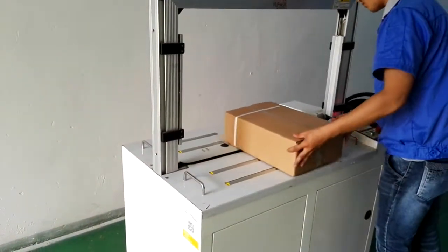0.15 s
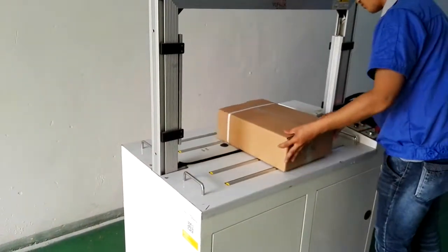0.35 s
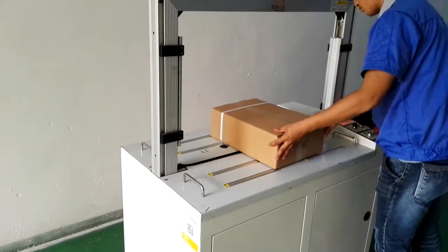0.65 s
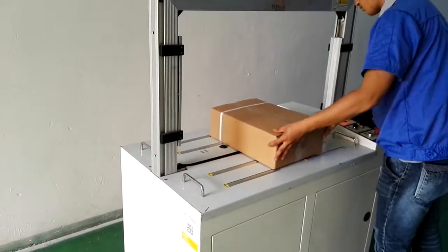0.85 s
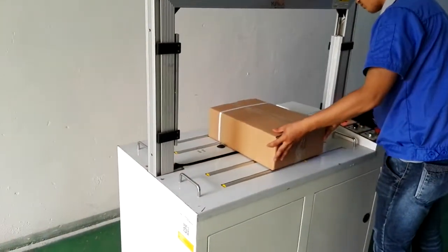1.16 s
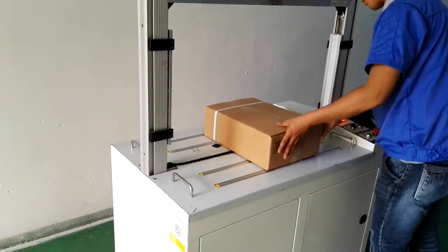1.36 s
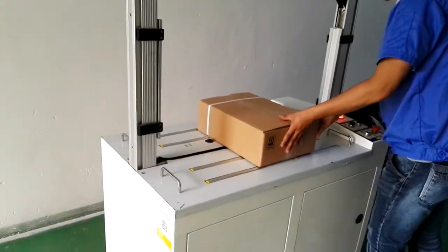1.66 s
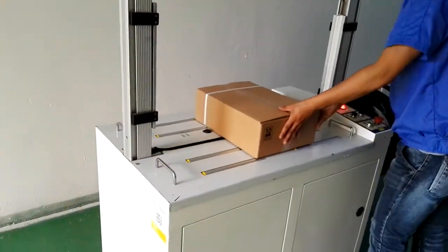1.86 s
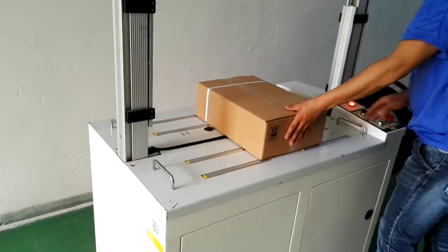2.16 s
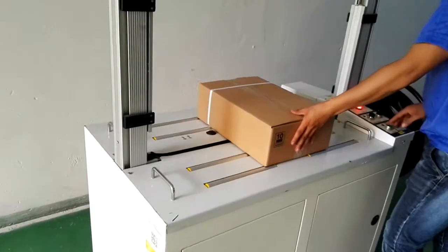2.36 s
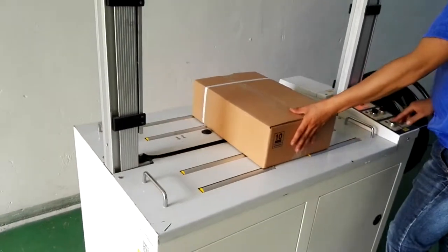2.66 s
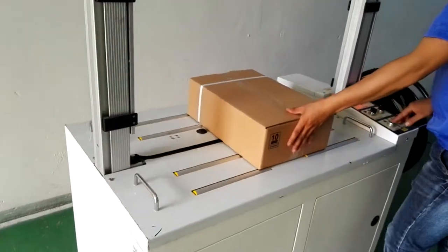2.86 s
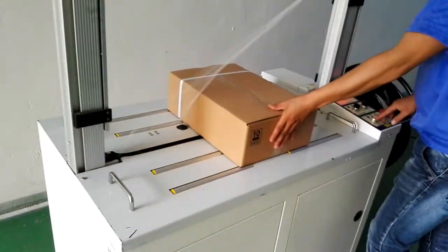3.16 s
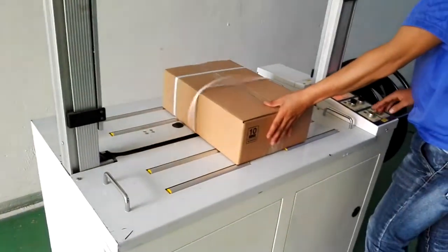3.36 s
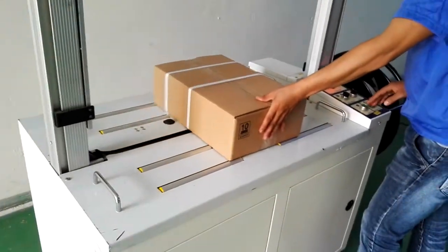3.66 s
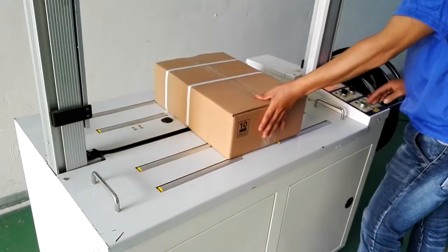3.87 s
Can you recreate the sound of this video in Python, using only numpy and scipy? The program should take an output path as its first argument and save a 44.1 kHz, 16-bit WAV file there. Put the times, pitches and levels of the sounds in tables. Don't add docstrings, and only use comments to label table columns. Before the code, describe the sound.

A strapping machine fires after almost three quiet seconds of hum, faint cardboard scrapes and brushes: clacks, racing strap rattle, brief gear whine, then a distorted slap at the close microphone and a reverberant factory tail.

```python
import sys
import numpy as np
from scipy import signal
from scipy.fft import rfft, irfft
from scipy.io import wavfile
from scipy.ndimage import uniform_filter1d

SR = 44100
rng = np.random.default_rng(int(sys.argv[2]) if len(sys.argv) > 2 else 0)


def transcribe(u):
    v = np.clip(np.atleast_2d(u).T, -1, 1)
    q = np.round(v * 32767).astype(np.int16)
    wavfile.write(sys.argv[1], SR, q)


def to_linear_factor(level_db):
    exponent = np.asarray(level_db, float) / 20
    return 10 ** exponent


N = 176400

# pitch_hz, width_hz, level_db
SLAP_RINGS = [(490, 150, -10), (1000, 200, -11), (4620, 220, -3.5), (7500, 500, -5), (11400, 600, -8),
              (13300, 900, -5)]
# freq_hz, left_minus_right_db
SLAP_PAN = [(60, 5.5), (200, 6), (700, 6), (4000, 3), (8000, 8), (14000, 2)]
# freq_hz, gain_db
SLAP_AWAY = [(600, 0), (3500, -1), (4600, -8), (6000, 0), (12000, 2)]
# time_s, level_db
STRAP_SPEED = [(3.055, -64), (3.09, -30), (3.15, -26.5), (3.21, -25), (3.285, -31), (3.31, -29.5),
               (3.43, -28), (3.47, -32.5), (3.54, -30.5)]
# freq_hz, density_db_per_hz
STRAP_TONE = [(59, -25), (100, -6.5), (358, -16.5), (699, -24.5), (880, -13), (1420, -4), (2560, -9.5),
              (10200, -12), (14800, -19)]
# pitch_hz, width_hz, level_db
CHUTE = (2857, 380, -13.5)
# time_s, level_db
DRIVE_LOAD = [(2.95, -46.5), (3.05, -39), (3.15, -35.5), (3.5, -39), (3.62, -35.5), (3.8, -43.5),
              (3.9, -39), (3.96, -45.5), (4.0, -37)]
# freq_hz, density_db_per_hz
DRIVE_TONE = [(24, -46), (40, -39), (122, 5.5), (362, -6), (706, 1), (839, -6), (1410, -6), (13700, -22),
              (14800, -22)]
# pitch_hz, level_db, t60_s
CLUTCH_MODES = [(221.6, -5, 0.29), (444, -6.5, 0.29), (665, -6.5, 0.48), (709, -1.5, 0.48),
                (793, -4.5, 0.37), (2000, -3, 0.22)]
# start_s, level_db, ring_hz, t60_s, thud_db
BLOWS = [(2.938, -23.5, 5600, 0.21, -12), (3.0674, -22, 7000, 0.13, -1), (3.0723, -21, 7100, .1, -4),
         (3.0942, -15.5, 6000, 0.14, 6), (3.1456, -8.5, 4000, 0.11, 9.5), (3.1505, -9.5, 7900, .14, 4),
         (3.1875, -14.5, 7500, 0.083, 1), (3.2196, -9, 10200, 0.11, -12), (3.293, -4.5, 9800, 0.16, -9),
         (3.4312, -13.5, 7250, 0.035, 3), (3.4919, -9, 9900, 0.064, -16), (3.4992, -20, 10500, 0.033, -19),
         (3.5154, -7, 9050, 0.11, -1.5), (3.5242, -14.5, 11100, 0.15, -2), (3.8298, -27, 4600, 0.15, 3),
         (3.896, -28, 3700, 0.16, -8), (3.994, -24.5, 6700, 0.08, 0.5)]
# start_s, pitch_hz, level_db, t60_s
PINGS = [(2.938, 5190, -40, 0.16), (2.938, 7230, -34.5, 0.095), (2.938, 8200, -37.5, .1),
         (3.151, 7900, -23, .04), (3.155, 4150, -24, .06), (3.22, 7400, -25, .04), (3.101, 1300, -26, .1),
         (3.2935, 10000, -22.5, 0.24), (3.2935, 4550, -19.5, 0.079), (3.2935, 13460, -20.5, .06),
         (3.2935, 12130, -27, 0.21), (3.4315, 7000, -22.5, 0.046), (3.4915, 9940, -24, 0.056),
         (3.516, 499, -32, .12)]
# freq_hz, gain_db
CABINET = [(30, -25), (90, -16), (125, -4), (200, 0.5)]
# time_s, mesh_db, shaft_db
GEAR_LOAD = [(3.15, -50, -46), (3.22, -40, -41), (3.3, -36, -36), (3.335, -27.5, -37), (3.36, -31, -40),
             (3.4, -29, -44), (3.495, -30.5, -44), (3.53, -37, -47), (3.65, -46, -54)]
# pitch_hz, width_hz, level_db
MESH_LINES = [(1392.5, 3, 0), (1468, 8, -13), (2780, 60, -18)]
# pitch_hz, width_hz, level_db
SHAFT_LINES = [(139, 10, -9), (276, 10, -7), (416, 10, -9), (541, 10, -7), (689, 12, 0), (712, 14, -6)]
# time_s, level_db
SLIDE = [
    (0.0, -54.5),
    (0.244, -63.5),
    (0.308, -61),
    (0.782, -74),
    (0.81, -67),
    (1.0, -90),
]
# freq_hz, density_db_per_hz
SLIDE_TONE = [(180, -11), (300, -16), (1400, -12), (2500, -13), (5000, -17), (8000, -24), (14800, -36)]
# start_s, length_s, level_db, upper_band_hz
BRUSHES = [
    (0.122, 0.8, -58.5, 10600),
    (0.621, 0.086, -61.5, 9900),
    (1.05, 0.07, -64, 11000),
    (1.429, 0.11, -66.5, 10100),
    (1.841, 0.31, -67, 9050),
    (2.264, 0.22, -71, 9000),
    (2.781, 0.17, -55.5, 6900),
]
# start_s, level_db, ring_hz, t60_s
TICKS = [(0.164, -46, 3900, 0.0083), (.2984, -50, 4000, 0.0087), (0.8048, -52, 5600, 0.01),
         (1.0514, -48, 8000, 0.009), (1.4304, -64, 4640, .008), (1.813, -52, 6360, 0.0092),
         (1.847, -47, 10500, 0.012), (1.992, -53, 4300, .008), (2.0656, -50.5, 3700, 0.0083),
         (2.1218, -52, 3460, 0.0088), (2.249, -47, 3900, 0.009), (2.267, -55, 4280, 0.0076),
         (2.2885, -47.5, 9900, 0.018), (2.2935, -54, 4200, .01)]
# pitch_hz, start_db, fade_db_per_s
COAST = [(143.2, -63, 9), (125.6, -76, .1), (283, -66, 7), (274, -76, 5), (630, -77, 12), (1402, -70, 18)]
# start_s, length_s, pitch_hz, level_db
GEAR_NOTES = [
    (0.0, 0.065, 1420, -55.5),
    (0.118, .08, 1430, -66),
    (.28, .09, 642, -64),
    (0.345, 0.039, 1400, -70),
]
# freq_hz, density_db_per_hz
HALL_TONE = [(25, -3.5), (60, -9), (100, -11), (450, -16), (1000, -17.5), (2300, -24.5), (3000, -30),
             (14800, -41)]
# freq_hz, likeness_0_to_1
HALL_SAME = [(60, .98), (250, 1), (600, 0.77), (1500, 0.099), (5000, 0.054), (14000, 0.23)]
# freq_hz, t60_s
ROOM_T60 = [(100, 2.6), (500, 1.54), (1500, 1.2), (4000, 1), (12000, 0.55)]
# freq_hz, likeness_0_to_1
NEAR_SAME = [(60, 0.99), (300, 0.96), (700, 0.85), (1500, 0.37), (5000, 0.073), (14000, 0.27)]
# freq_hz, gain_db
MIC_CASE = [(3000, -1), (3350, -5.5), (3750, 1)]
# freq_hz, left_minus_right_db
PORT_BALANCE = [(60, 0.5), (600, -0.5), (1260, 3), (2300, -1.5), (4250, -0.5), (7800, -5), (14400, -8.5)]

SLAP_S, SLAP_RISE_S, SLAP_HOLD_S, SLAP_DB = 3.5086, 0.0032, 0.0009, -4
PUSH_S, PUSH_DB = 0.003, -23.5
CLUTCH_S, CLUTCH_DB = 2.94, -38
HUM_HZ, HUM_DB, HUM_WAVER_DB = 134.4, -62, 1.8
HALL_DB, HALL_LEAD_S = -61, 0.000327
ROOM_DB, EARLY_DB = -7, -17.5
WHINE_WET_DB, SLAP_WET_DB = -16, -9.5
NEAR_LEAD_SAMPLES, SLAP_LEAD_SAMPLES = 7, 2


def evened(x):
    return x / np.sqrt(np.mean(x ** 2) + 1e-20)


def read(points, hz):
    f, value = np.transpose(points)
    return np.interp(np.log(hz + 1), np.log(f + 1), value)


def level(curve, off_db=-120):
    s, db = np.transpose(curve)
    return to_linear_factor(np.interp(np.arange(N) / SR, s, db, off_db, off_db))


def add(mix, start_s, sound):
    part = mix[round(start_s * SR):][:len(sound)]
    part += sound[:len(part)]


def colour(x, tone):
    return irfft(rfft(x) * to_linear_factor(read(tone, np.fft.rfftfreq(N, 1 / SR))), N)


def resonate(x, hz, width_hz):
    q = max(hz / width_hz, 0.3)
    return signal.lfilter(*signal.iirpeak(np.clip(hz, 20, 20000), q, SR), x)


def drift(span_s):
    size = int(span_s * SR)
    return evened(uniform_filter1d(uniform_filter1d(rng.standard_normal(N), size), size))


def rattle(per_s, spread_db, smooth):
    knocks = to_linear_factor(spread_db * np.minimum(rng.exponential(1, N), 5)) * (rng.random(N) < per_s / SR)
    decaying = evened(signal.lfilter([1], [1, -0.97], knocks))
    return rng.standard_normal(N) * (smooth + decaying)


def knock(hz, t60_s, thud_db, ring_db, rise_s):
    t = np.arange(0, 0.25, 1 / SR)
    a, b = rng.standard_normal((2, len(t)))
    body = evened(resonate(a, 3000 + 0.58 * hz, 10700))
    body += to_linear_factor(ring_db) * evened(resonate(a, hz, 0.054 * hz + 150))
    body += to_linear_factor(thud_db) * evened(resonate(b, 1440, 2160))
    return np.minimum(t / rise_s, 1) * to_linear_factor(-60 * t / max(t60_s, 0.004)) * body


def slap():
    out, t = np.zeros(N), np.arange(2000) / SR
    rise = np.minimum(t / SLAP_RISE_S, 1) ** 2
    fall = to_linear_factor(-9000 * np.maximum(t - SLAP_RISE_S - SLAP_HOLD_S, 0))
    noise = rng.standard_normal(len(t))
    crack = 0.47 * noise
    for hz, width_hz, db in SLAP_RINGS:
        sine = np.sin(2 * np.pi * (hz * t + rng.random()))
        crack += to_linear_factor(db) * evened(evened(resonate(noise, hz, width_hz)) + 1.9 * sine)
    crack = crack / np.sqrt(uniform_filter1d(crack ** 2, size=60) + 0.22)
    push = np.sin(np.pi * np.clip(t / PUSH_S - 0.5, 0, 1.5)) * np.exp(-t / 0.011)
    add(out, SLAP_S, to_linear_factor(SLAP_DB) * rise * fall * crack + to_linear_factor(PUSH_DB) * push)
    return out


def strap():
    rip = evened(colour(rattle(1200, 2.8, 2.0), STRAP_TONE))
    hz, width_hz, db = CHUTE
    return level(STRAP_SPEED) * (rip + to_linear_factor(db) * evened(resonate(rip, hz, width_hz)))


def cam_drive():
    return level(DRIVE_LOAD) * to_linear_factor(-1.5) * evened(colour(rattle(400, 2.3, 2.6), DRIVE_TONE))


def steel_pings():
    out, t = np.zeros(N), np.arange(SR // 2) / SR
    for s, hz, db, t60_s in PINGS:
        pair = sum(np.sin(2 * np.pi * (hz * k * t + rng.random())) for k in (0.985, 1.017))
        add(out, s, to_linear_factor(db - 5.5 - 60 * t / t60_s) * np.minimum(t / 0.0015, 1) * pair)
    return out


def clutch():
    out, t = np.zeros(N), np.arange(SR // 2) / SR
    modes = sum(to_linear_factor(db - 60 * t / t60_s) * np.sin(2 * np.pi * hz * t) for hz, db, t60_s in CLUTCH_MODES)
    add(out, CLUTCH_S, to_linear_factor(CLUTCH_DB) * np.minimum(t / 0.035, 1) * modes)
    return out


def blows():
    out = np.zeros(N)
    for s, db, hz, t60_s, thud_db in BLOWS:
        add(out, s - 0.001, to_linear_factor(db - 14) * knock(hz, t60_s, thud_db, -9.5, 0.0016))
    return out


def machine():
    return strap() + cam_drive() + steel_pings() + clutch() + blows()


def whine():
    load, out = np.array(GEAR_LOAD), np.zeros(N)
    for column, lines in ((1, MESH_LINES), (2, SHAFT_LINES)):
        for hz, width_hz, db in lines:
            gain = level(load[:, [0, column]]) * to_linear_factor(db + 1.5 * drift(0.015))
            cycles = np.cumsum(hz + 0.4 * width_hz * drift(0.02)) / SR
            out += gain * np.sin(2 * np.pi * cycles)
    return out


def box_slide():
    return level(SLIDE) * evened(colour(rattle(220, 2.9, 4.2), SLIDE_TONE))


def brushes():
    out = np.zeros(N)
    for s, length_s, db, hz in BRUSHES:
        u = np.linspace(0, 1, int(length_s * SR))
        a = rng.standard_normal(SR)[:len(u)]
        mid_db = 2.5 - 8 * (s < 1.2)
        bands = to_linear_factor(mid_db) * resonate(a, 4450, 2600) + to_linear_factor(-1.5) * resonate(a, 2370, 800)
        bands += resonate(resonate(a, hz, 1.3 * hz), hz, 1.5 * hz)
        add(out, s, to_linear_factor(db) * np.minimum(u / 0.081, 1) * (1 - u) * bands)
    return out


def card_ticks():
    out = np.zeros(N)
    for s, db, hz, t60_s in TICKS:
        add(out, s - 0.001, to_linear_factor(db - 3.5) * knock(hz, t60_s, -21, 1.5, 0.0004))
    return out


def hands():
    return box_slide() + brushes() + card_ticks()


def hum():
    t = np.arange(N) / SR
    waver = to_linear_factor(HUM_DB + HUM_WAVER_DB * drift(0.033))
    out = waver * np.sin(2 * np.pi * HUM_HZ * t + 0.23 * drift(0.11))
    for hz, db, fade_db in COAST:
        gain = to_linear_factor(db - fade_db * t + 1.6 * drift(0.1))
        out += gain * np.sin(2 * np.pi * hz * t + 0.3 * drift(0.1))
    for s, length_s, hz, db in GEAR_NOTES:
        size = int(length_s * SR)
        add(out, s, to_linear_factor(db) * np.hanning(size) * np.sin(2 * np.pi * hz * t[:size]))
    return out


def hall():
    frames, hz = N // 256 + 5, np.fft.rfftfreq(1024, 1 / SR)
    a, b, c, d, patches = rng.standard_normal((frames, 513, 5)).T
    patches = evened(uniform_filter1d(uniform_filter1d(patches, 12, 0), 14, 1))
    same = np.clip(read(HALL_SAME, hz), 0, 1)[:, None]
    left = a + 1j * b
    delay = np.exp(-2j * np.pi * hz * HALL_LEAD_S)[:, None]
    right = same * left * delay + np.sqrt(1 - same ** 2) * (c + 1j * d)
    z = np.array([left, right]) * to_linear_factor(read(HALL_TONE, hz)[:, None] + 1.0 * patches)
    return to_linear_factor(HALL_DB) * evened(signal.istft(z, nperseg=1024, noverlap=768)[1][:, :N])


def room(x):
    taps = np.zeros((2, 2 * SR))
    at = np.arange(500, 2 * SR - 20, 20) + rng.integers(0, 20, (2, (2 * SR - 501) // 20))
    np.put_along_axis(taps, at, rng.choice([-1., 1.], at.shape), 1)
    hz, t, z = signal.stft(taps, SR, nperseg=256)
    tail = signal.istft(z * to_linear_factor(-60 * t / read(ROOM_T60, hz)[:, None]), SR, nperseg=256)[1]
    tail = to_linear_factor(ROOM_DB) * tail / np.linalg.norm(tail[0])
    early = rng.integers(60, 1300, (2, 10))
    bounces = to_linear_factor(EARLY_DB - early / 110) * rng.choice([-1., 1.], early.shape)
    np.put_along_axis(tail, early, bounces, 1)
    return signal.fftconvolve(x[None], tail, axes=1)[:, :N]


def alike(pair, same):
    c = np.clip(read(same, np.fft.rfftfreq(N, 1 / SR)), 0, 1)
    second = c * rfft(pair[0]) + np.sqrt(1 - c ** 2) * rfft(pair[1])
    return np.array([pair[0], irfft(second, N)])


def panned(pair, balance):
    half = np.array(balance) * [1, 0.5]
    return np.array([colour(pair[0], half), colour(pair[1], half * [1, -1])])


def scene():
    near = np.array([colour(machine(), CABINET) + hands() for port in "LR"])
    crack = np.array([slap() for port in "LR"])
    gears = whine()
    left, right = alike(near, NEAR_SAME) + gears
    thrown = colour(colour(crack[0], CABINET), SLAP_AWAY)
    wet = room(near[0] + to_linear_factor(WHINE_WET_DB) * gears + to_linear_factor(SLAP_WET_DB) * thrown)
    crack_right = 0.85 * np.roll(crack[0], SLAP_LEAD_SAMPLES) + 0.45 * crack[1]
    box = panned([crack[0], crack_right], SLAP_PAN)
    close = np.array([left, np.roll(right, NEAR_LEAD_SAMPLES)]) + box + alike(wet, HALL_SAME)
    return panned([colour(port, MIC_CASE) for port in close] + hall() + hum(), PORT_BALANCE)


def top_cut(x):
    return signal.sosfilt(signal.butter(12, 14950, fs=SR, output="sos"), x)


def record(dry):
    low_pass = signal.firwin(1023, 14240, window=("kaiser", 7), fs=SR)
    mix = np.clip(signal.oaconvolve(dry, low_pass[None], "same"), -1, 1)
    return top_cut(mix)


dry = scene()
out = record(dry)
transcribe(out)
```